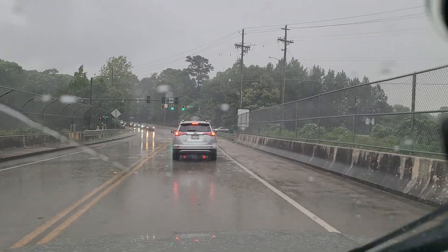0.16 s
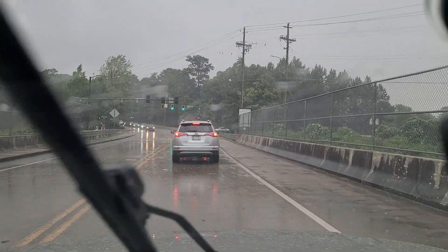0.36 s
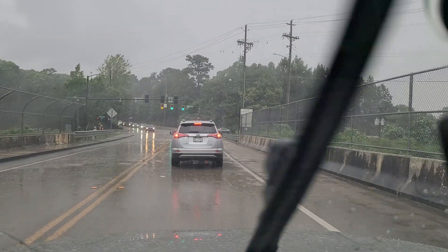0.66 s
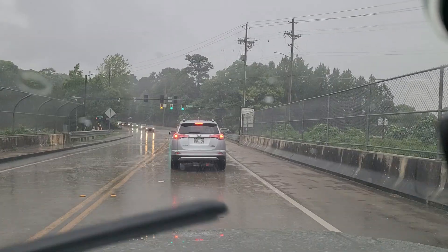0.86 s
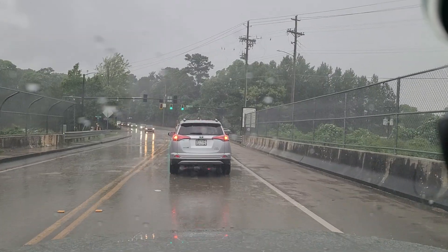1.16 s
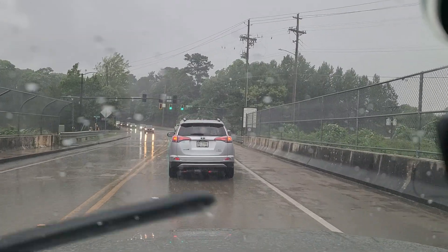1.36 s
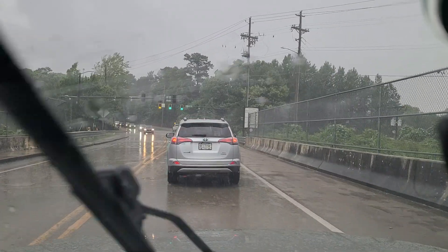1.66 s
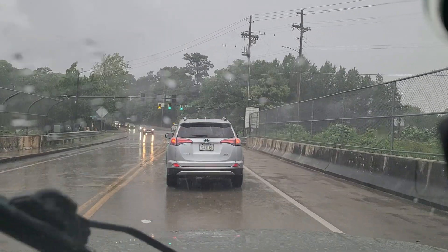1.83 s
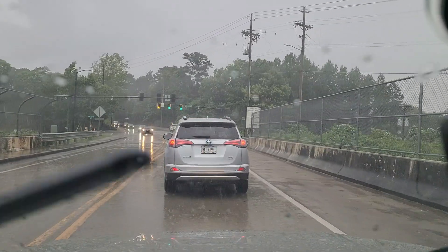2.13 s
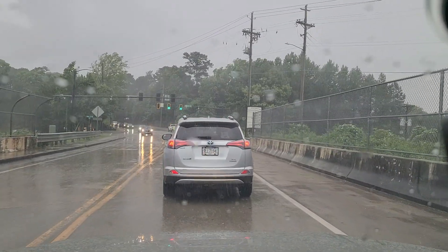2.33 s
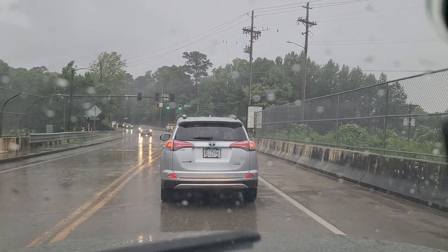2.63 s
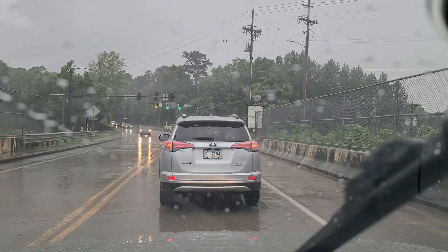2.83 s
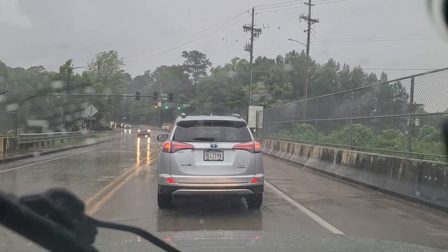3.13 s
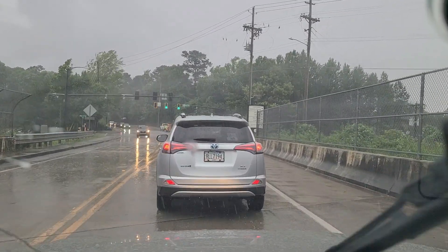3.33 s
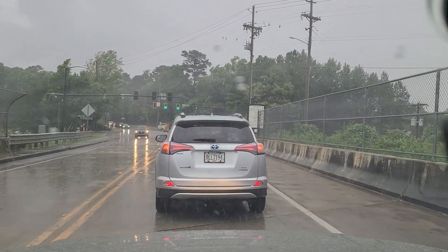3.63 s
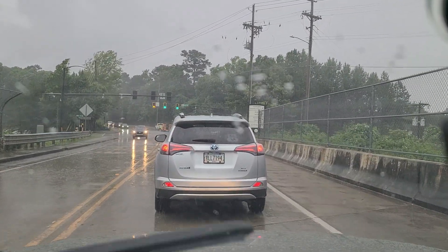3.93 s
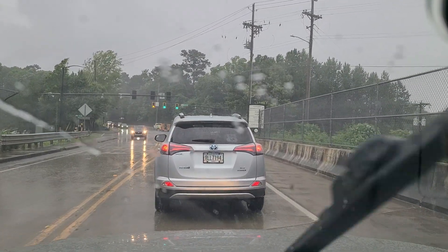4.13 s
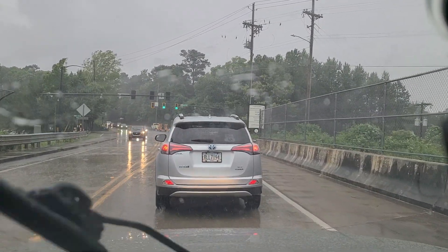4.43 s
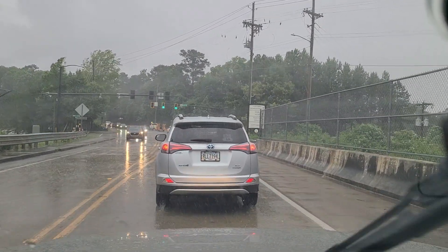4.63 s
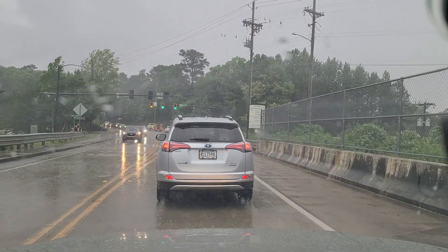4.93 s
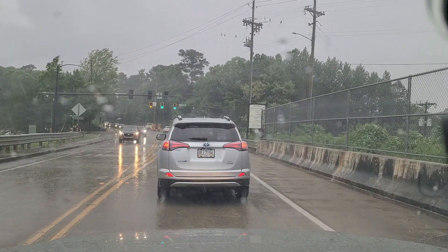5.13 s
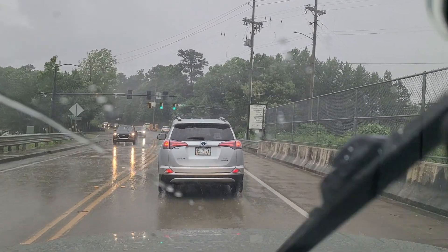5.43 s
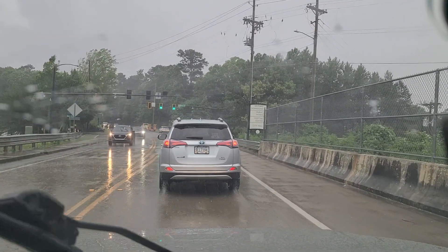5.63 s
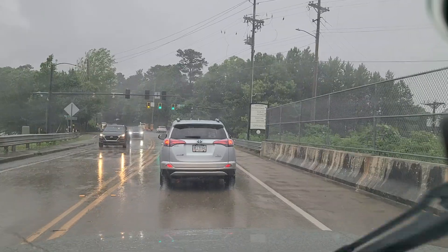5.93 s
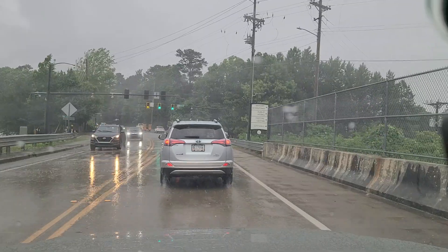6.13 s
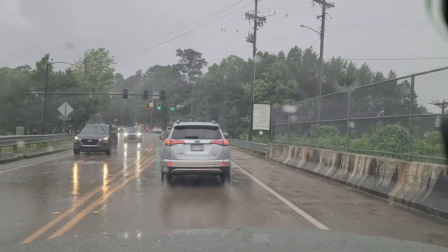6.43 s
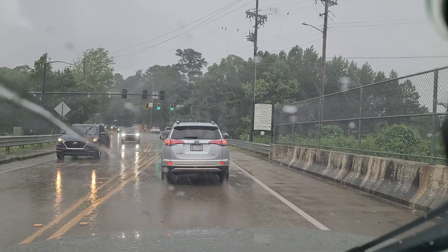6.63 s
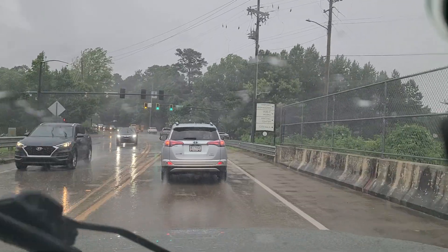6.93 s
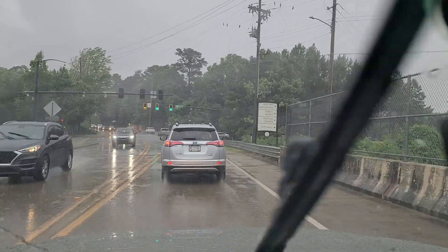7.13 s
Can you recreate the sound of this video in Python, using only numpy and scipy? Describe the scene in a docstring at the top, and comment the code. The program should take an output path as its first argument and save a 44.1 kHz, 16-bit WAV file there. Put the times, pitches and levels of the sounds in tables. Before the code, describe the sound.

A stereo cabin microphone, close and bass-heavy, catches rain hissing over the windscreen and roof, loud at first, thinner midway, stronger at the end. The car jolts softly and slows to a throaty idle. Wiper blades thud, judder and chirp on wet glass over a regular dry relay tick. Late on, the engine swells into a deep boom, plastic trim rattles, then revs climb smoothly.

```python
"""Inside a car creeping in a queue in heavy rain. Rain patters and hisses as flickering bands of noise; the wipers
groan, scrape and knock, ringing windscreen modes, and rubber chirps as noise in narrow resonances. The body rumbles
as filtered noise. The engine, a sum of harmonics, slows to idle, then pulls away and booms. A relay ticks in the
dash and heavy drops snap, as short bursts; a loose trim panel buzzes as a train of dry slaps."""
import sys
import numpy as np
from scipy import signal
from scipy.fft import rfft, irfft, next_fast_len
from scipy.io import wavfile
from scipy.ndimage import uniform_filter1d

SR = 44100
rng = np.random.default_rng(int(sys.argv[2]) if len(sys.argv) > 2 else 0)


def inscribe(sig):
    """Save sig as 16-bit PCM at rate SR to the path in sys.argv[1].

    A 1-D sig is mono; a 2-D sig holds one channel per row.
    Samples are clipped to [-1, 1] before scaling.
    """
    pcm = np.round(np.clip(np.atleast_2d(sig).T, -1, 1) * 32767)
    wavfile.write(sys.argv[1], SR, pcm.astype(np.int16))


def level_to_linear(level):
    """Convert decibel levels to linear amplitude factors, elementwise."""
    exponent = np.asarray(level, float) / 20
    return 10 ** exponent


N = 321489   # samples
SIZE = next_fast_len(N + SR // 2)   # transform length, samples
HZ = np.maximum(np.arange(SIZE // 2 + 1) * SR / SIZE, 1)   # frequency of each bin
RIGHT_LAG_S = 0.00046   # rain and scrape reach the right channel late

# cabin noise colour: frequency_hz, relative_db
CABIN_COLOUR = [(8.8, -36), (15, 6.5), (43, -3.5), (87, -8.5), (199, -21.5), (263, -16.5), (380, -18),
                (570, -20), (656, -27.5), (1000, -4.5), (1300, -54), (2200, -120)]
# cabin resonances added to it: frequency_hz, width_hz, height_db
CABIN_RESONANCES = [(80.55, 23.2, 13), (159.3, 33, 5.5), (257, 27, 6), (577, 80, 4.5)]
# part of the noise power shared by the channels: frequency_hz, share_0_to_1
COHERENCE = [(30, 0.74), (80, 1), (130, 0.81), (290, 0.74), (600, 0.17), (1000, 0.21), (1500, 0.18),
             (3000, 0.076), (8000, 0.065), (15000, .05)]
# channel balance of the continuous sources: frequency_hz, left_minus_right_db
BALANCE = [(60, -0.5), (180, -2), (550, -2), (1650, -1.0), (4970, -2.5), (15000, -2.5)]
# rain and wet scrape as the microphone hears them, dark near 9 kHz: frequency_hz, relative_db
WET_COLOUR = [(350, -30), (600, -2.5), (651, -4.5), (767, -5), (941, -8.5), (1190, -5), (1470, -11),
              (1960, -10.5), (2950, -17.5), (4210, -24), (5160, -27.5), (7260, -29.5), (8900, -46.5),
              (12200, -42.5), (15600, -44)]
# peaks and a dip added to it: frequency_hz, width_hz, height_db
WET_PEAKS = [(1199, 38, 2.5), (2000, 180, 1.5), (3000, 960, 5), (7780, 850, 3), (8820, 660, -5.5)]
# rainfall, used as swings about the mean: time_s, glass_patter_db, roof_drumming_db
RAINFALL = [(0.0, -43, -40.5), (0.24, -40.5, -39), (0.61, -42.5, -39.5), (1.06, -44.5, -43),
            (1.34, -45.5, -43.5), (1.89, -42, -39), (2.27, -43.5, -40), (2.88, -49, -44.5),
            (3.31, -49, -43.5), (3.51, -50, -48.5), (3.74, -50, -47), (3.96, -47, -42.5), (4.2, -49.5, -45),
            (4.55, -47, -44), (4.83, -47, -43), (5.07, -47.5, -44), (5.6, -47.5, -44.5), (6.07, -47, -44.5),
            (6.7, -43.5, -40.5), (7.29, -41, -40)]
# roof drumming, patter, hiss: level_db at mean rainfall, swing_share of the rainfall's swing
RAIN_RESPONSE = [(-38, 0.94), (-43.5, 1.01), (-54, 1.1)]
# finest treble spray: time_s, level_db
SPRAY_LEVEL = [(0, -65), (.3, -62), (.55, -69.5), (.78, -62), (1.05, -69), (1.6, -66), (1.97, -65),
               (2.5, -69.5), (2.95, -82), (3.5, -64), (3.75, -68), (4.0, -68), (4.45, -74.5), (4.65, -70),
               (5.1, -75), (5.5, -73.5), (5.75, -74), (6.4, -68.5), (6.6, -67), (7.0, -67), (7.17, -59.5),
               (7.29, -69)]
# drumming, patter, hiss, spray: low_hz, high_hz, near_drop_share_0_to_1, gustiness_db
RAIN_BANDS = [(650, 1574, 0, 1.39), (1520, 3700, 0.09, 1.1), (3790, 10400, 0.15, 1.43),
              (8700, 14000, 0.1, 2)]
# body rumble from road and engine mounts: time_s, drumming_db
BODY_RUMBLE = [(0.0, -23), (0.6, -28.5), (1.4, -27.5), (2.2, -30.5), (3.0, -31), (3.6, -32.5), (4.3, -35.5),
               (5.3, -33.5), (5.6, -27), (6.1, -29), (6.7, -25.5), (7.29, -28)]
# jolts from the road: start_s, drumming_db, shudder_db
ROAD_JOLTS = [(0.04, -12, -28.5), (0.48, -14, -17.5), (0.67, -28, -24), (0.88, -25.5, -38),
              (1.075, -17.5, -39), (2.45, -31, -20), (3.8, -22, -44), (4.5, -26, -36), (7.18, -29, -19)]
# engine slowing to idle, pulling away, gaining speed: time_s, firing_hz, firing_tone_db, second_db, third_db
ENGINE_RUN = [(0.0, 38.1, -13, -56, -57), (0.22, 35, -24.5, -45, -43), (0.74, 35.06, -25, -44, -46),
              (0.97, 33.14, -31, -46, -43), (1.2, 28.5, -27, -50, -49), (1.5, 26.42, -27, -46, -44.5),
              (2.65, 26.15, -29.5, -37, -39), (3.2, 29.47, -27.5, -52, -39), (3.45, 28.0, -32, -40, -42.5),
              (4.0, 26.43, -32.5, -42, -40.5), (4.94, 27.7, -34.5, -41, -43), (5.25, 29.4, -31, -38, -45),
              (5.36, 33.0, -25, -36, -43), (5.44, 35.6, -17, -32, -42), (5.514, 38.6, -12, -32, -38),
              (5.59, 42.2, -16.5, -27, -40), (5.65, 42.5, -12.5, -26, -39), (5.8, 43.2, -11.5, -27, -34),
              (5.94, 43.8, -12.5, -27, -35), (6.04, 45.6, -16, -27, -40), (6.13, 47.5, -19.5, -35, -42),
              (6.2, 48.8, -33, -37, -39), (6.3, 51.2, -26, -43, -37.5), (6.5, 60.05, -26, -42, -35.5),
              (6.7, 62.5, -43, -37, -31), (6.96, 66.26, -35, -27.5, -33.5), (7.15, 67.0, -28, -31, -40),
              (7.29, 66.1, -31, -31.5, -37.5)]
# roar from road, wiper motor and a passing car: time_s, lower_band_db, upper_band_db
LOW_MIDDLE_ROAR = [(0.0, -31, -36), (0.35, -32, -32), (0.95, -38, -36), (1.45, -33, -36.5),
                   (2.2, -36.5, -34), (2.9, -36, -37), (3.6, -35, -40.5), (4.0, -34, -36), (4.8, -33, -37),
                   (5.4, -31.5, -37.5), (6.0, -33, -35), (6.3, -30, -33.5), (6.6, -29, -32.5),
                   (6.9, -28.5, -33), (7.29, -27, -32)]
# wiper reversals and snags: start_s, hold_s, groan_db, groan_delay_s, judder_db
WIPER_TURNS = [(0.428, 0.066, -26, 0.064, -28.5), (1.119, 0.17, -28.5, 0.0055, -48),
               (1.703, 0.12, -27, 0.06, -28.5), (2.44, 0.041, -28.5, 0.01, -40),
               (2.565, 0.023, -31, 0.005, -34.5), (2.65, 0.027, -26.5, 0.0044, -34),
               (3.003, 0.12, -29, 0.061, -30.5), (3.729, .01, -23.5, 0.0059, -40),
               (3.79, 0.12, -28, 0.0088, -37.5), (4.173, 0.058, -30, 0.017, -30),
               (4.298, 0.086, -25, 0.04, -28.5), (5.013, .04, -24.5, 0.012, -38),
               (5.479, 0.2, -28, .03, -29), (6.31, 0.027, -24.5, 0.0041, -45),
               (6.89, .1, -30, 0.032, -31.5)]
# blade and linkage knocks: time_s, strength_db, brightness_db_per_octave
WIPER_KNOCKS = [(0.439, -16.5, 12), (0.499, -19, -5), (1.144, -31, -3), (1.271, -21.5, 2), (1.371, -34, -5),
                (1.72, -23, -13), (1.799, -22, -1.0), (2.448, -16, -13), (2.584, -23.5, 10),
                (2.666, -19, -1.0), (2.746, -30, 2), (3.009, -20.5, 16.5), (3.1, -17.5, -5),
                (3.17, -24, -8), (3.741, -18, -15.5), (4.212, -14, -7), (4.279, -22, 0), (4.318, -14.5, 3),
                (4.349, -16.5, 4), (4.377, -16.5, 3), (4.398, -30, 2), (4.432, -27, -13), (5.031, -23, -12),
                (5.26, -22.5, -7), (5.492, -10.5, -4), (5.593, -17, -4), (5.679, -17, -1.0),
                (6.331, -19, -9), (6.923, -16.5, -1), (6.951, -11, -4)]
# windscreen modes: frequency_hz, relative_db, t60_s
WINDSCREEN_MODES = [(122, -6, 0.11), (154, -4, 0.05), (261, -18, 0.12), (345, 11, 0.039), (445, 3, 0.048),
                    (523, -11, 0.14)]
# relay dropping and closing in turn: time_s, strength_db
RELAY_TICKS = [(0.618, -36), (1.2434, -30), (1.9156, -48), (2.5436, -26.5), (3.2123, -31), (3.8372, -28.5),
               (4.508, -33), (5.131, -28), (5.7952, -32.5), (6.4165, -30), (7.0768, -36)]
# heavy drops: time_s, strength_db, top_end_strength_db, left_minus_right_db
DROP_HITS = [(1.551, -38, -61, 0), (1.7933, -33, -66, 3), (2.0708, -42, -64, 1), (2.2797, -52, -65, -6),
             (2.689, -39, -66, 0), (2.809, -35.5, -60.5, 0.5), (3.0929, -44, -76, 3),
             (3.7172, -39, -65.5, -4), (4.3913, -36, -72, -1), (4.6184, -37, -67.5, -3),
             (6.0849, -37, -62, 1), (6.5994, -36, -63, 0)]
# rubber chirping on glass: start_s, onset_db, pitch_hz, t60_s
RUBBER_CHIRPS = [(3.078, -40, 2000, 0.057), (3.095, -49, 4200, 0.074), (3.12, -39, 2519, 0.11),
                 (4.228, -30, 1199, 0.099), (4.374, -42.5, 4233, 0.039), (4.39, -27.5, 1280, 0.059),
                 (4.394, -41, 3000, .08), (5.019, -39, 3600, 0.033), (5.662, -39, 4696, 0.063),
                 (5.663, -25, 1210, 0.055), (5.684, -35.5, 3810, 0.046)]


def rms_one(x):
    """Normalisation: scales a signal to unit root mean square."""
    return x / np.sqrt(np.mean(x ** 2) + 1e-20)


def in_time(rows):
    """Linear interpolation: table columns become per-sample curves."""
    s, *columns = np.transpose(rows)
    return [np.interp(np.arange(N) / SR, s, c) for c in columns]


def at_hz(points):
    """Interpolation on a logarithmic frequency axis, at every bin."""
    hz, value = np.array(points).T
    return np.interp(np.log(HZ), np.log(hz + 1), value)


def window(low_hz, high_hz):
    """Steep band-pass magnitude; the power of bands sharing an edge adds evenly there."""
    return 1 / np.sqrt((1 + (low_hz / HZ) ** 12) * (1 + (HZ / high_hz) ** 12))


def decay(x, t60):
    """Exponential decay: every impulse starts at its height and falls 60 dB in t60 seconds."""
    return signal.lfilter([1], [1, -level_to_linear(-60 / (t60 * SR))], x + 1e-18)


def ring(clicks, hz, t60):
    """Damped resonance: a unit click starts a decaying sine of height 1."""
    r, w = level_to_linear(-60 / (t60 * SR)), 2 * np.pi * hz / SR
    return signal.lfilter([0, np.sin(w)], [1, -2 * r * np.cos(w), r * r], clicks + 1e-18)


def drift(rate_hz):
    """Low-passed random fluctuation of unit spread, computed at every 40th sample."""
    r = np.exp(-80 * np.pi * rate_hz / SR)
    slow = signal.lfilter([1], [1, -2 * r, r * r], rng.standard_normal(N // 40 + 2002))[2000:]
    return np.interp(np.arange(N) / 40, np.arange(len(slow)), rms_one(slow))


def swells(start_s, level_db, hold_s, rise_s, t60):
    """Addition of powers: envelopes that rise, hold and fall exponentially."""
    power = np.zeros(N)
    age = np.arange(SR) / SR
    for s, db, hold in np.broadcast(start_s, level_db, hold_s):
        at = round(s * SR)
        fall_db = 60 * np.maximum(age - rise_s - hold, 0) / t60
        shape = np.minimum(age / rise_s, 1) * level_to_linear(db - fall_db)
        power[at:at + SR] += shape[:N - at] ** 2
    return power


def cabin_noise(low_hz, high_hz, spectrum=CABIN_COLOUR, peaks=CABIN_RESONANCES, lag_s=0):
    """Partial coherence: coloured noise shared by both channels plus noise of each, at unit rms."""
    colour_db = at_hz(spectrum)
    for hz, width_hz, db in peaks:
        colour_db = colour_db + db / (1 + (2 * (HZ - hz) / width_hz) ** 2)
    alike = at_hz(COHERENCE)
    shared, *own = rfft(rng.standard_normal((3, SIZE)))
    delay = np.exp(-2j * np.pi * HZ * lag_s * np.c_[[0, 1]])   # right channel only
    channels = np.sqrt(alike) * shared * delay + np.sqrt(1 - alike) * np.array(own)
    return rms_one(irfft(channels * level_to_linear(colour_db) * window(low_hz, high_hz), SIZE)[:, :N])


def wet_noise(low_hz, high_hz):
    """Spectral shaping: rain and wet scrape as the microphone hears them, the shared part late at the right."""
    return cabin_noise(low_hz, high_hz, WET_COLOUR, WET_PEAKS, RIGHT_LAG_S)


def drops(per_s, spread_db, t60):
    """Shot noise: power envelope of random, uneven, quickly dying impacts, with mean 1."""
    sizes = level_to_linear(2 * spread_db * np.minimum(rng.exponential(1, N), 2))
    power = decay(sizes * (rng.random(N) < per_s / SR), t60 / 2)
    power = uniform_filter1d(power, size=90)   # each splash spreads over two milliseconds
    return power / power.mean()


def burst(rows, level_db, t60, low_hz, high_hz, steady=0):
    """Impulsive excitation: decaying noise puffs, panned by the last column; steady adds a clean snap."""
    rows, clicks = np.array(rows), np.zeros((2, N))
    clicks[:, (rows[:, 0] * SR).astype(int)] = level_to_linear(level_db + rows[:, -1] * np.c_[[.5, -.5]])
    puffs = steady * clicks + decay(clicks, t60) * rng.standard_normal((2, N))
    return irfft(rfft(puffs, SIZE) * window(low_hz, high_hz), SIZE)[:, :N]


def rain():
    """Superposed impacts: near drops flash in the upper bands together over a blur of far ones."""
    near, gust = drops(100, 6.0, 0.024), drift(13.6)
    glass_db, roof_db = in_time(RAINFALL)
    levels_db = []
    for (db, swing_share), fall_db in zip(RAIN_RESPONSE, (roof_db, glass_db, glass_db)):
        levels_db.append(db + swing_share * (fall_db - fall_db.mean()))
    levels_db += in_time(SPRAY_LEVEL)
    out = 0
    for db, (low_hz, high_hz, near_share, gust_db) in zip(levels_db, RAIN_BANDS):
        flicker = np.sqrt(1 - near_share + near_share * near)
        out = out + level_to_linear(db + gust_db * gust) * flicker * wet_noise(low_hz, high_hz)
    return out


def rumble():
    """Forced vibration: the body drums on its mounts in three low bands, two swelling after each jolt."""
    deep_db, steady_shudder_db = -19, -5   # against the drumming
    rise_s, t60_s = 0.022, 0.29
    road_db, = in_time(BODY_RUMBLE)
    s, drumming_db, shudder_db = np.transpose(ROAD_JOLTS)
    drumming = np.sqrt(level_to_linear(2 * road_db) + swells(s, drumming_db, 0.012, rise_s, t60_s))
    steady_power = level_to_linear(2 * (road_db + steady_shudder_db))
    shudder = np.sqrt(steady_power + swells(s, shudder_db, 0.017, rise_s, t60_s))
    deep = level_to_linear(road_db + deep_db) * cabin_noise(18, 31)
    return deep + shudder * cabin_noise(36, 43.8) + drumming * cabin_noise(63.4, 93.0)


def engine():
    """Harmonic series on the firing rate; uneven combustion wavers pitch and strength, most in high harmonics."""
    fourth_db = -3.5   # against the third harmonic
    unloaded_waver_db, boom_db = 1.5, -17.5   # extra waver when the firing tone is weaker than a boom
    firing_hz, *harmonics_db = in_time(ENGINE_RUN)
    harmonics_db.append(harmonics_db[-1] + fourth_db)
    phase = 2 * np.pi * np.cumsum(firing_hz * (1 + 0.0043 * drift(2.8))) / SR
    phase = phase + 0.081 * np.c_[[1, -1]]   # the two channels are slightly out of step
    waver_db = 0.65 + unloaded_waver_db * np.clip((boom_db - harmonics_db[0]) / 6.0, 0, 1)
    out = 0
    for k, db in enumerate(harmonics_db):
        level = level_to_linear(db + (waver_db + 0.49 * k) * drift(12))
        out = out + np.sqrt(2) * level * np.sin((k + 1) * phase + k)
    return out


def dulled(x):
    """Low-pass filtering: rubber and felt dull every contact."""
    return signal.sosfilt(signal.butter(4, 750, fs=SR, output="sos"), x)


def roar_and_wiper_scrape():
    """Stick-slip friction: groan, lumpy judder and wet scrape swell at each reversal over the roar."""
    rise_s, t60_s = 0.0089, 0.37
    lower_db, upper_db = in_time(LOW_MIDDLE_ROAR)
    s, hold_s, groan_db, delay_s, judder_db = np.transpose(WIPER_TURNS)
    groan = np.sqrt(level_to_linear(2 * lower_db) + swells(s + delay_s, groan_db, hold_s, rise_s, t60_s))
    judder = np.sqrt(level_to_linear(2 * upper_db) + swells(s, judder_db, hold_s, rise_s, t60_s))
    slips = np.sqrt(0.67 + 0.18 * drops(45, 1.7, 0.15))
    low_bands = groan * cabin_noise(118.7, 248.6) + judder * cabin_noise(273, 636)
    scrape = level_to_linear(-10.0) * judder ** 1.38   # grows faster than the judder
    return dulled(slips * low_bands) + scrape * slips * wet_noise(700, 5500)


def wiper_knocks():
    """Modal excitation: each knock rings the windscreen's modes with uneven strengths."""
    s, strength_db, brightness_db = np.transpose(WIPER_KNOCKS)
    at = ((s + .0025) * SR).astype(int)
    out = np.zeros(N)
    for hz, mode_db, t60 in WINDSCREEN_MODES:
        uneven_db = rng.normal(0, 3.0, len(s))
        tilt_db = brightness_db * np.log2(hz / 300)
        clicks = np.zeros(N)
        clicks[at] = -level_to_linear(strength_db + mode_db + uneven_db + tilt_db - 13.0)
        out += ring(clicks, hz, t60)
    return dulled(out)


def snaps(rows):
    """Impact transient: a snap with a short ring-out, and a separate puff in the top end."""
    strength_db, top_db = np.array(rows)[:, 1:3].T
    body = burst(rows, strength_db - 3.5, 0.034, 2700, 6670, steady=3.5)
    return body + burst(rows, top_db + 10.0, .06, 10300, 15000)


def relay():
    """Contact impact: a relay in the dash snaps as it drops and closes by turns."""
    top_db, pan_db = (-56, -59), -4.5   # top-end strength when dropping and closing; left minus right
    return snaps([(s, db, top_db[k % 2], pan_db) for k, (s, db) in enumerate(RELAY_TICKS)])


def heavy_drops():
    """Single impacts: heavy drops, each at its own place between left and right."""
    return snaps(DROP_HITS)


def chirps():
    """Stick-slip oscillation: rubber squeals as dying noise in a narrow resonance."""
    out, t = np.zeros((2, N)), np.arange(SR // 4) / SR
    for s, db, hz, t60 in RUBBER_CHIRPS:
        squeal = rms_one(ring(rng.standard_normal((2, len(t))), hz, .009))
        at = round(s * SR)
        out[:, at:at + len(t)] += level_to_linear(db - 60 * t / t60) * np.minimum(t / 0.0008, 1) * squeal
    return out


def trim_buzz():
    """Repeated impact: a loose panel gives dry, uneven plastic slaps near the firing rate, then fades."""
    count, start_s, per_s = 16, 5.5705, 44.6
    strength_db, hold_s, fade_db_per_s, pan_db = -38, 0.17, 58, -7.5
    uneven = rng.standard_normal((count, 3))   # strength, time, pan
    age = np.arange(count) / per_s
    slap_db = strength_db - fade_db_per_s * np.maximum(age - hold_s, 0) + 1.1 * uneven[:, 0]
    slaps = np.c_[start_s + age + .0012 * uneven[:, 1], pan_db + 2.0 * uneven[:, 2]]
    body = burst(slaps, slap_db, 0.0046, 3200, 7000, steady=5.2)
    return body + burst(slaps, slap_db - 17, .008, 9500, 15500, steady=3.0)


def scene():
    """Superposition of all sources; the continuous ones and the knocks lean to the right channel."""
    balanced = rain() + rumble() + engine() + roar_and_wiper_scrape() + wiper_knocks()
    lean = level_to_linear(at_hz(BALANCE) * np.c_[[.5, -.5]])
    leaning = irfft(rfft(balanced, SIZE) * lean, SIZE)[:, :N]
    return leaning + relay() + heavy_drops() + chirps() + trim_buzz()


def top_cut(x):
    """Nothing passes above the cut-off."""
    return signal.sosfilt(signal.butter(12, 15710, fs=SR, output="sos"), x)


def record(dry):
    """Superposition is complete: the finished mix goes on at its own level."""
    return top_cut(dry)


dry = scene()
out = record(dry)
inscribe(out)
```